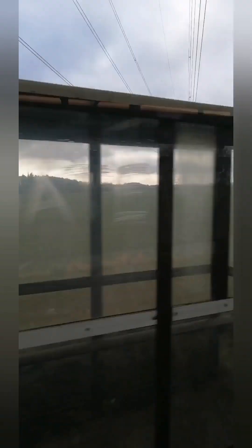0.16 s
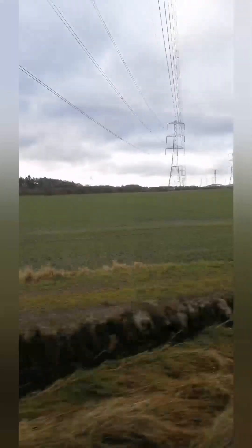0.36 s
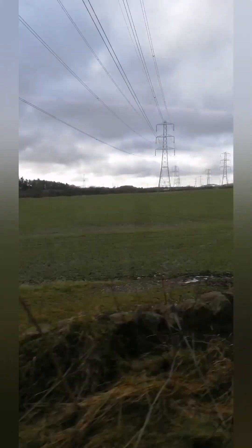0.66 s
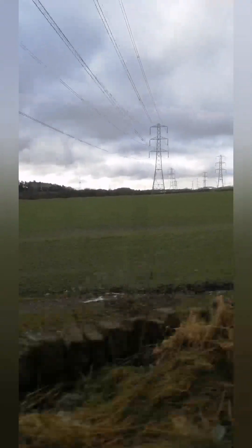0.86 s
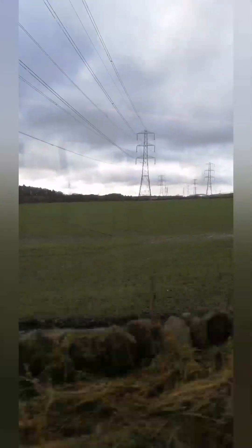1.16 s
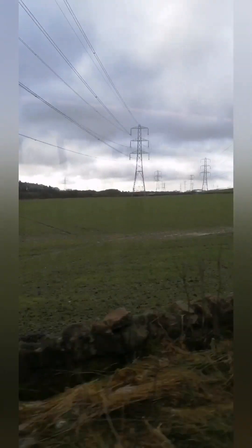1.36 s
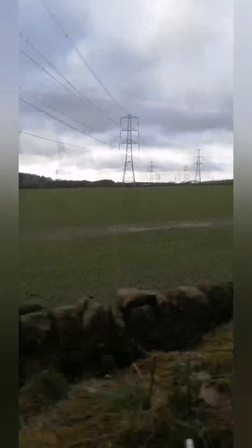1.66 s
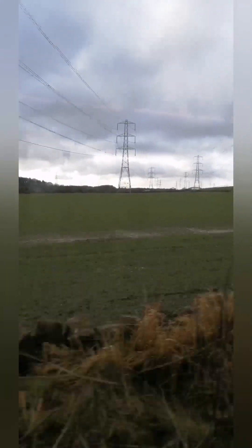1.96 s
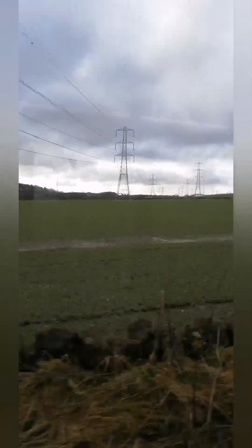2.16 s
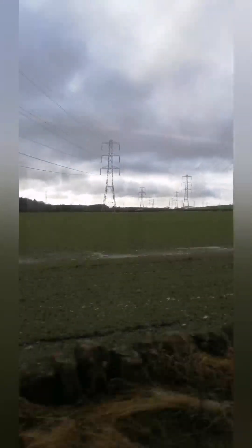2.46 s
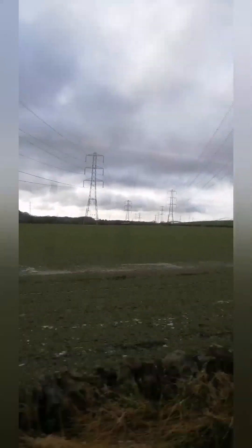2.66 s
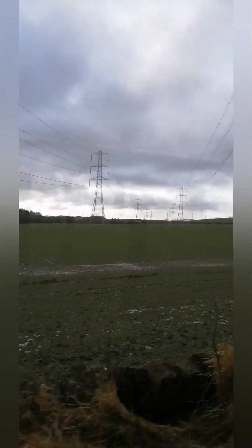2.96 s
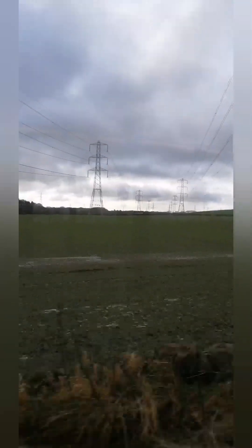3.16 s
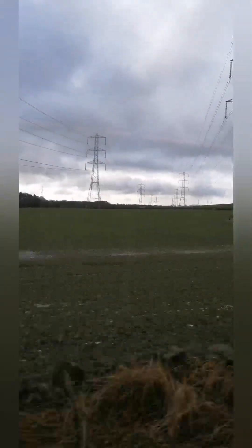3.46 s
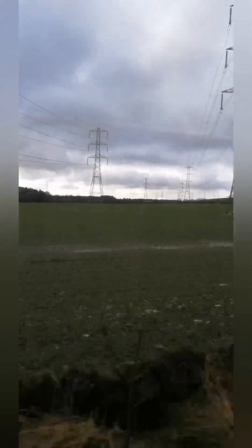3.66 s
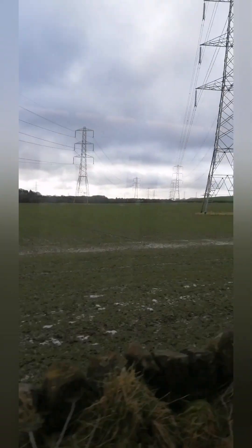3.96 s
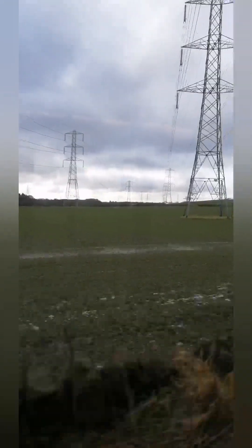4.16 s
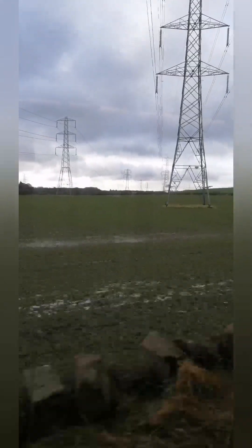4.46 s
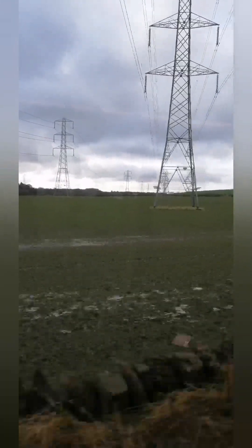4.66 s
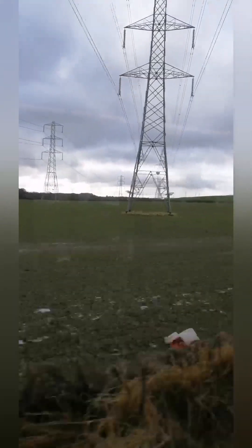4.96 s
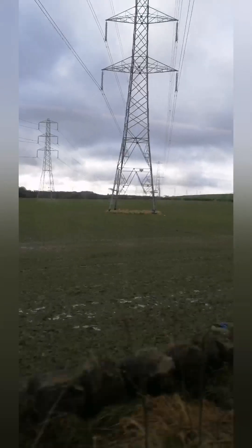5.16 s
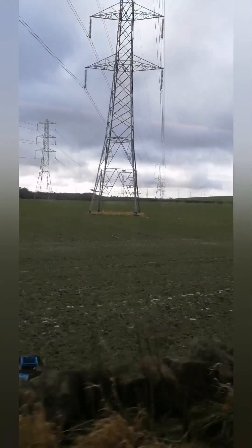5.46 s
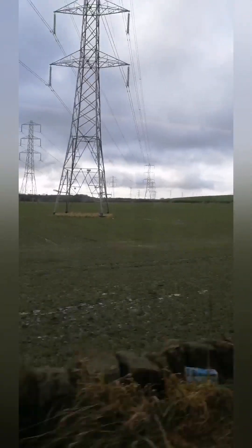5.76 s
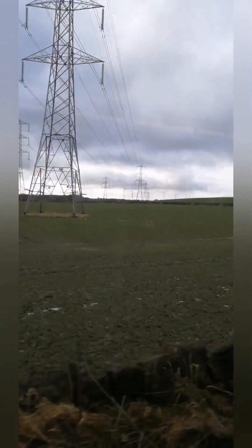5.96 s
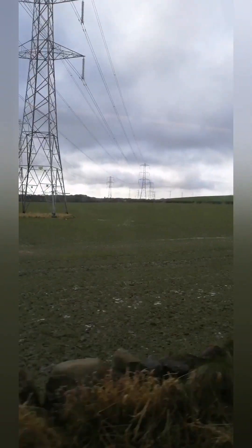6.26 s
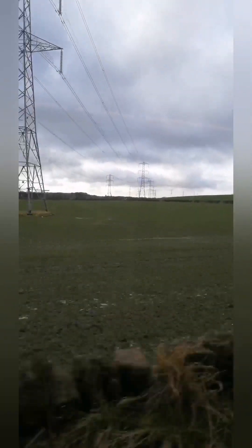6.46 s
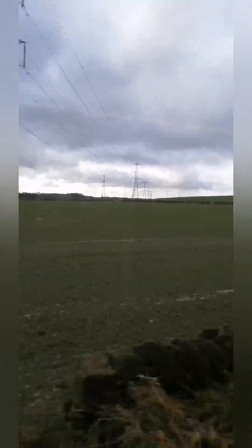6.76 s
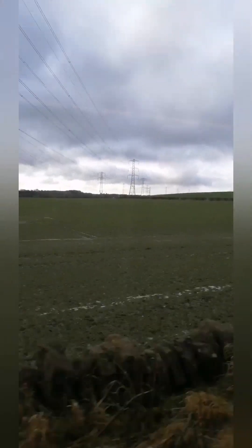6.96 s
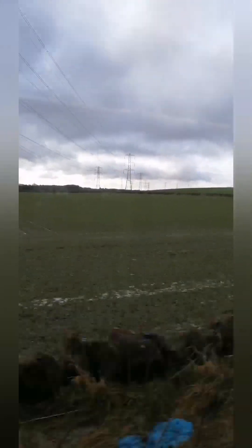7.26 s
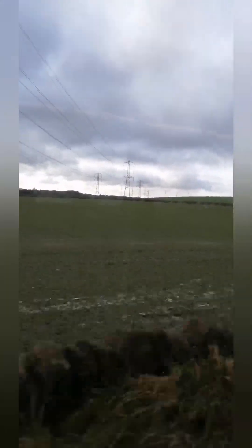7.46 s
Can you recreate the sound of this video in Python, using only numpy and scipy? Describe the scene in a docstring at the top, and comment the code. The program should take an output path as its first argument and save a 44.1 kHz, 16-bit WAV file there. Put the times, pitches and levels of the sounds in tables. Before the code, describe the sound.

From a bus window seat: low engine drone, rumbling road and hissing wet tyres, with splashes, thuds and rattles over a rough stretch.

```python
"""A bus engine, heard from a window seat on a wet country road: it hums, changes up a gear and pulls again.
Road speed sets the pitch of engine and gear whine; engine load sets the hum and the clatter, all made of
sines and pulsed noise. The road rumbles and the tyres roar as filtered noise; noise and random drops make
the crackling spray, most of all in a run of puddles. An air valve hisses close to the start; over broken
asphalt the body knocks, judders and booms, fittings tick and squeak, and a thin sizzle lies on top."""
import sys
import numpy as np
from scipy import signal
from scipy.fft import rfft, irfft, next_fast_len
from scipy.io import wavfile
from scipy.ndimage import uniform_filter1d, map_coordinates

SR = 44100
rng = np.random.default_rng(int(sys.argv[2]) if len(sys.argv) > 2 else 0)


def store_pcm(level_fs):
    """Save levels as 16-bit WAV."""
    pcm = np.round(np.clip(level_fs, -1, 1) * 32767).astype(np.int16)
    wavfile.write(sys.argv[1], SR, np.atleast_2d(pcm).T)


N = 335484  # samples

# All levels are relative: stereo balance, random wobble and other offsets may be added to them.
# A t60 is the time in which a sound falls by 60 dB.

# The cabin around the seat.
# Likeness of the left and right channels. Each row: frequency in Hz, likeness from -1 to 1.
LEFT_RIGHT_LIKENESS = [(60, .99), (100, .97), (160, .94), (270, .87), (450, .58), (740, .1), (1220, -.1),
                       (2000, 0)]
# Air resonances of the cabin. Each row: frequency in Hz, width in Hz, lift in dB.
CABIN_MODES = [(159.6, 14, 3), (205, 20, 4.5), (369.3, 16, 2.5), (666, 19, 2.5), (780, 78, 1.5)]
TOP_HZ = 15760  # band limit of the phone

# Road speed, as the rate at which the final drive's teeth mesh. Each row: time in seconds, rate in Hz.
TOOTH_MESH_RATE = [(0, 558.8), (1.1, 581), (1.7, 585.5), (3.3, 556.2), (4.25, 570.3), (7.61, 614.2)]
# Engine load, eased off for the gear change. Each row: time in seconds, level about full pull in dB.
ENGINE_LOAD = [(0, -11), (.25, 0), (.9, 1), (1.5, -5), (1.9, -9.5), (4, -12), (4.25, -0.5), (5, -0.5),
               (6, -3), (7.35, 0.5), (7.61, -11)]
LOW_GEAR, HIGH_GEAR = 9.81, 12.46  # tooth meshes per firing
SHIFT_AT_S, SHIFT_TAKES_S = 1.75, 0.55
# Level of the firing tone itself. Each row: time in seconds, level in dB.
FIRING_TONE_LEVEL = [(0, -36.5), (.5, -26), (1.1, -30), (1.6, -28), (2.8, -29), (3.4, -28), (4.3, -25.5),
                     (4.7, -44), (5.05, -45), (5.45, -35), (5.8, -24), (7.61, -24)]
# Orders of the firing rate; those between the whole ones come from unequal cylinders.
# Each row: multiple of the firing rate, level in low gear in dB, level in high gear in dB, dB gained per dB of load.
HUM_ORDERS = [(1.25, -33, -48, 0.5), (1.75, -42, -49, .3), (2, -23.5, -22.5, 1), (2.25, -38.5, -47, 0),
              (2.75, -37, -51, 1), (3, -32, -37.5, 0.4), (3.5, -55, -38.5, 0.4), (4, -43, -52.5, 0.5),
              (5.5, -46.5, -49, 0.1), (7, -56, -47.5, 1.2)]
CLATTER_DB, CLATTER_PER_LOAD = -47, 0.67  # level in dB, dB gained per dB of load
SLOW_ENGINE_DB = -4  # the engine clatters less once it turns slower, in high gear
# Spectrum of the clatter. Each row: frequency in Hz, left in dB, right in dB.
CLATTER_SPECTRUM = [(350, -11, -16), (595, -7, 4.5), (810, -1.5, 1), (970, -8.5, -2), (1290, -12, -5.5),
                    (2000, -22.5, -26), (2580, -14.5, -11.5), (4000, -36, -39), (9000, -50, -48)]

# Spells in which the gears sing. Each row: start in seconds, length in seconds, level in dB.
GEAR_WHINES = [(.82, 0.59, -44), (1.4, 0.11, -40.5), (1.9, 0.14, -42.5), (2.62, 0.17, -47),
               (3.08, 0.32, -42), (3.6, 0.097, -43), (5.1, .54, -47.5)]
WHINE_FLOOR_DB = -53.5

# Coarseness of the asphalt. Each row: time in seconds, tyre noise in dB, shaking of the body in dB.
ASPHALT = [(0, -10.5, -11.5), (.25, -6.5, -7.5), (.9, -3, -7.5), (1.55, -0.5, -4.5), (1.9, 1, 0.5),
           (2.3, -1, -1), (2.65, -1.5, 1), (3.1, 0, -1), (5.2, 1, -0.7), (6.6, 0.8, -1.7), (7.2, 0, -3),
           (7.45, 1, -1.5), (7.61, -3, -1.5)]
RUMBLE_DB, ROAR_DB, SWAY_DB = -24.5, -34.5, -30.5
# Spectra of body rumble, tyre roar and deep lurching. Each row: frequency in Hz, left in dB, right in dB.
RUMBLE_SPECTRUM = [(10, -15, -17), (22, -10, -0.5), (33, -13.5, 0.5), (71, -4, -1.5), (122, -10.5, -3),
                   (150, -8.5, -4.5), (214.5, -14.5, -8.5), (243, -15.5, -9.5), (295, -24, -19.5),
                   (465, -41, -36), (900, -74, -74)]
ROAR_SPECTRUM = [(150, -21.5, -11), (289, -10.5, -7.5), (357, -8, 0.5), (382, -8.5, -2.5), (399, -13, -6),
                 (544.6, -15, -11), (538, -9, -7.5), (707, -17.5, -12.5), (914, -22, -16.5),
                 (1105, -30, -22), (1740, -37.5, -28.5), (3060, -37, -44), (3780, -54.5, -55),
                 (8000, -65, -74)]
LURCH_SPECTRUM = [(5, -20, -20), (12, 4, -1), (22.7, 6, 6.5), (40, -18, -19), (90, -36, -43),
                  (300, -81, -76)]

SPRAY_DB, SLOSH_DB = -58, -53.5  # the film of water that covers the whole road
# Puddles, and first a brief swell as the tyre noise echoes off a roadside shelter. Each row: start in seconds,
# length in seconds, spray in dB, slosh in dB.
PUDDLE_EVENTS = [(0.17, 0.048, -62, -48), (0.826, 0.13, -58.5, -51.5), (1.198, 0.3, -65, -54.5),
                 (1.48, 0.14, -54, -47), (1.87, 0.13, -49.5, -45.5), (1.978, 0.075, -42, -43.5),
                 (2.118, 0.62, -53, -55.5), (2.316, 0.26, -49.5, -43), (2.645, 0.28, -54.5, -52),
                 (7.203, 0.16, -52.5, -54), (7.285, 0.17, -51.5, -46), (7.407, .25, -43.5, -43)]
PUDDLE_ATTACK_S, PUDDLE_RELEASE_S = 0.078, 0.83
# Level of the finest fizz of the water. Each row: time in seconds, level in dB.
FIZZ_LEVEL = [(0, -69.5), (3.4, -63), (4.2, -63), (6.5, -64.5), (7.1, -62.5), (7.35, -57), (7.61, -51)]
# Spectra of spray, slosh and fizz. Each row: frequency in Hz, left in dB, right in dB.
SPRAY_SPECTRUM = [(900, -42, -26), (2020, -6, 2), (3120, -6.5, -2), (3820, -14, -15.5), (5270, -3, -1),
                  (6080, -9, -3.5), (7030, -2.5, 1.5), (8200, -1.5, -11.5), (9000, -9, -15.5),
                  (11500, -19, -22), (14000, -24, -26), (15800, -34, -22)]
SLOSH_SPECTRUM = [(300, -2.5, -39), (895, 1, -5.5), (1430, -5.5, 3.5), (2160, -6.5, -3), (3090, -9.5, -8),
                  (4020, -18, -22.5), (8000, -42, -49)]
FIZZ_SPECTRUM = [(2000, -10, -2), (4000, -18, -0.5), (7000, -6, 8.5), (9500, -13, -12), (10200, -8, -5.5),
                 (13800, -12, -8), (15000, -16, -6), (15800, -19, -22)]

# Level of the topmost sizzle. Each row: time in seconds, level in dB.
SIZZLE_LEVEL = [(0, -74), (1.1, -73), (1.5, -81), (3.4, -78), (4.2, -69.5), (6.4, -70), (7.61, -71)]
# Spectrum of the sizzle. Each row: frequency in Hz, left in dB, right in dB.
SIZZLE_SPECTRUM = [(13500, -39, -39), (14700, -6, 3), (15200, -5, -3), (15800, -22, -23)]
SIZZLE_FLUTTER_HZ, SIZZLE_FLUTTER_DB = 12, 1.6
# Thin whistling lines above the spray. Each row: frequency in Hz, level in dB.
WHISTLE_LINES = [(10100, -79), (10580, -81), (10900, -82), (11650, -80)]
# The spell in which they sound. Each row: start in seconds, length in seconds, level in dB.
WHISTLING_SPELL = [(3.85, 1.8, 0)]

# Puffs of the air valve. Each row: start in seconds, length in seconds, level in dB.
VALVE_PUFFS = [(.04, 0.099, -59.5), (.14, 0.089, -55)]
VALVE_START_HZ, VALVE_END_HZ, VALVE_SINK_S = 8930, 7650, 0.078
SPIT_DB, SPIT_T60_S = -48, 0.26  # the burst as the valve opens

# Ticks of loose fittings. Each row: start in seconds, clack in dB, bright edge in dB.
FITTING_TICKS = [(.771, -50, -55), (.972, -49, -64), (1.949, -50, -53), (2.718, -40, -51),
                 (3.853, -50, -66), (4.369, -46, -62), (4.429, -46, -53), (5.712, -54, -57),
                 (6.594, -41, -54), (7.183, -43, -56), (7.329, -42, -39)]
TICK_T60_S, EDGE_T60_S = 0.026, 0.022
# Bumps. Each row: start in seconds, thud of the floor in dB, boom of the body in dB,
# knock of the wheel arch in dB, rattle of the panels in dB.
ROAD_BUMPS = [(2.048, -31, -29, -37, -32), (2.07, -34, -34, -24.5, -46), (2.126, -23, -33, -28, -48),
              (2.225, -19.5, -32, -29, -48), (2.284, -15, -30, -30, -50), (2.315, -13.5, -25, -42, -52),
              (2.455, -21, -18, -26, -27), (2.522, -29, -24, -25, -33), (2.6, -16, -28, -33, -44),
              (2.748, -15, -20.5, -29, -33), (2.803, -17, -34, -42, -46), (2.847, -26, -14.5, -32.5, -24.5),
              (3.309, -26, -21.5, -42, -52), (3.78, -24, -25.5, -28, -50)]
PANEL_T60_S, ARCH_T60_S = 0.16, 0.15
# Spectra of clack, bright edge, wheel arch and panels. Each row: frequency in Hz, left in dB, right in dB.
CLACK_SPECTRUM = [(500, -18, -12), (1200, -1, 4), (2600, -1, 1), (4000, -14, -11), (7000, -13, -8),
                  (11000, -22, -19), (15000, -26, -24)]
EDGE_SPECTRUM = [(3000, -25, -25), (7000, -6, -4), (12000, -9, -8), (14600, -1, 4), (15800, -10, -8)]
ARCH_SPECTRUM = [(200, -30, -24), (332, 0, 9.5), (500, -1, -2), (850, -19, -8.5), (1300, -19, -17),
                 (3000, -41, -41)]
PANEL_SPECTRUM = [(90, -12, -10), (204, 15.5, 6), (450, -14, 5), (800, -6, 0), (1180, -9, 4.5),
                  (2000, -19, -8), (3007, -28, -33), (8000, -61, -64)]

# Splashes in the wheel arch. Each row: start in seconds, level in dB, t60 in seconds,
# share of coarse drops from 0 to 1.
ARCH_SPLASHES = [(.94, -52, .45, .3), (1.514, -39, .36, 0.07), (1.579, -39.5, .26, .8),
                 (1.625, -36, 0.2, .15), (1.849, -38.5, 0.3, 0.4), (2.028, -34.5, 0.3, .85),
                 (2.108, -36, 0.34, .4), (2.318, -38, 0.24, 0.2), (2.402, -34, 0.17, .1),
                 (2.484, -38.5, .3, 0.7), (2.604, -36.5, .3, .7), (2.91, -40, 0.27, .3),
                 (3.011, -41, .43, .3), (3.06, -43.5, 0.46, 0.3), (3.165, -50, .46, .3),
                 (3.255, -45, .29, 0.1), (4.095, -46, .41, .5), (5.04, -48.5, 0.26, .2),
                 (5.788, -33, 0.095, .4), (5.839, -36, .25, 0.34), (5.987, -38, 0.26, .35),
                 (6.281, -41, 0.31, 0.4), (6.466, -40, .14, .3), (7.158, -41.5, .33, 0.5),
                 (7.22, -44, 0.45, .3), (7.322, -40, .4, .2)]
SPLASH_RISE_S = 0.011
# Spectra of fine and coarse drops. Each row: frequency in Hz, left in dB, right in dB.
FINE_SPECTRUM = [(1500, -34, -30), (2950, -4, -14), (3900, -20, -28), (6140, -16, -13), (7100, -4, 0),
                 (7800, 1.5, -8), (9100, -5.5, -12), (11000, -21, -24), (15800, -25, -19)]
COARSE_SPECTRUM = [(1500, -30, -23), (2950, -3, 0), (3900, -19, -19), (5230, -3, 0), (6140, -6, 0),
                   (7100, -1, 3), (7900, -2, -10), (9150, -9, -14), (11000, -19, -22), (15800, -24, -19)]

# Heaves of the body on its springs. Each row: start in seconds, length in seconds, level in dB.
BODY_HEAVES = [(1.38, 0.088, -27.5), (1.75, 0.43, -24), (2.33, 0.21, -22)]
# Stretches of broken asphalt. Each row: start in seconds, length in seconds, level in dB.
BROKEN_STRETCHES = [(2.08, 0.35, -28), (2.55, 0.21, -32), (2.95, 0.51, -32), (3.72, 0.13, -29),
                    (7.28, .16, -31)]
# Spectrum of the judder. Each row: frequency in Hz, left in dB, right in dB.
JUDDER_SPECTRUM = [(25, -22, -13), (55, -4, 2.5), (84.5, -1, 4.5), (127, -6, 1), (197, -19, -12.5),
                   (280, -13, -8.5), (386, -23, -11.5), (497, -21, -13.5), (900, -68, -65)]

# Deep water under the wheel. Each row: start in seconds, length in seconds, level in dB.
DEEP_WATER = [(1.95, 0.34, -38.5), (7.33, 0.27, -38)]

# What a bump rings in the body. Each row: frequency in Hz, level in dB, t60 in seconds.
BODY_RESONANCES = [(206.3, -3, 0.36), (378, -26, 0.33)]
FLOOR_T60_S, FLOOR_HZ = 0.27, 59.1

# Rubs of squeaking fittings. Each row: start in seconds, length in seconds, pitch in Hz, level in dB,
# roughness as a share of the pitch.
FITTING_RUBS = [(2.612, .018, 2020, -44, .045), (2.802, .015, 2010, -51, .04),
                (3.79, .045, 3320, -62, .035), (4.1, .075, 3085, -61.5, .011),
                (4.208, .048, 3062, -57, .009), (7.455, .025, 11900, -62, .014),
                (7.555, .04, 12050, -61, .011)]


def amp(db):
    """Decibels to gain."""
    return 10 ** (np.asarray(db) / 20)


def unit(x):
    """x at rms 1."""
    return x / np.sqrt(np.mean(x ** 2) + 1e-20)


def along(points, hz):
    """Each column of (Hz, value, ..) points on a log axis."""
    f, *cols = np.transpose(points)
    return np.array([np.interp(np.log(hz + 1), np.log(f + 1), c) for c in cols])


def curves(rows):
    """One value per sample for each column after the time."""
    s, *cols = np.transpose(rows)
    return [np.interp(np.arange(N) / SR, s, c) for c in cols]


def wobble(rate):
    """A smooth random curve, rate knots a second."""
    knots = rng.standard_normal(int(N * rate / SR) + 4)
    return map_coordinates(knots, [np.arange(N) * rate / SR])


def filtered(x, response):
    """x times a response of frequency."""
    m = next_fast_len(N + SR // 2)
    return irfft(rfft(x, m) * response(np.fft.rfftfreq(m, 1 / SR)), m)[..., :N]


def phase_of(hz):
    """Running phase of a moving frequency."""
    return 2 * np.pi * np.cumsum(hz) / SR


def narrow_noise(width_hz):
    """Stereo noise of rms 1 close to 0 Hz, which a sine carries up to its own pitch as a band."""
    return unit(filtered(rng.standard_normal((2, N)), lambda f: 1 / (1 + (f / width_hz) ** 2)))


def cabin(pair, spectrum):
    """Two unrelated signals as a diffuse field of rms 1: alike in the bass, apart in the treble, with resonances."""
    def mid_side(hz):
        turn = np.arccos(np.clip(along(LEFT_RIGHT_LIKENESS, hz)[0], -1, 1)) / 2
        return np.array([np.cos(turn), np.sin(turn)])

    def colour(hz):
        lift = sum(db / (1 + (2 * (hz - centre) / width) ** 2) for centre, width, db in CABIN_MODES)
        return amp(along(spectrum, hz) + lift)

    mid, side = filtered(pair, mid_side)
    return unit(filtered(np.array([mid + side, mid - side]), colour))


def rush(spectrum, patchy_db):
    """Cabin noise with drifting patches of random gain."""
    z = signal.stft(rng.standard_normal((2, N)), nperseg=512)[2]
    field = uniform_filter1d(rng.standard_normal(z.shape[1:]), size=5, axis=0)  # across frequency
    field = uniform_filter1d(field, size=14, axis=1)  # across time
    patchy = signal.istft(z * amp(patchy_db * unit(field)), nperseg=512)[1][:, :N]
    return cabin(patchy, spectrum)


def droplets(rate, scatter_db):
    """Single drops strike at random moments, rate a second, with unequal force."""
    struck = rng.random((2, N)) < rate / SR
    force = amp(scatter_db * rng.standard_normal((2, N)))
    return unit(struck * rng.standard_normal((2, N)) * force)


def bursts(events, rise):
    """Envelope of (s, dB, t60) events that swell and die away."""
    power = np.zeros(N)
    for s, db, t60 in events:
        t = np.maximum(np.arange(N) / SR - s, 0)
        power += (amp(db - 60 * t / t60) * (1 - np.exp(-t / rise))) ** 2
    return np.sqrt(power)


def swells(events, attack, release):
    """Envelope of (s, length, dB) events: each rises, holds, then falls 60 dB in the release time."""
    t = np.arange(N) / SR
    power = np.zeros(N)
    for s, length, db in events:
        fall_db = 60 * np.maximum(t - s - length, 0) / release
        power += (np.clip((t - s) / attack, 0, 1) * amp(db - fall_db)) ** 2
    return np.sqrt(power)


def shifted():
    """0 in low gear, 1 in high gear, sliding between them during the change."""
    return np.clip((np.arange(N) / SR - SHIFT_AT_S) / SHIFT_TAKES_S, 0, 1)


def firing_rate():
    """The engine turns with the road speed, through the gear that is engaged."""
    mesh_hz, = curves(TOOTH_MESH_RATE)
    return mesh_hz / (LOW_GEAR + (HIGH_GEAR - LOW_GEAR) * shifted())


def engine():
    """The firing pulses reach the seat as a firing tone and a few orders, most of which grow with the load."""
    load_db, = curves(ENGINE_LOAD)
    gear = shifted()
    phase = phase_of(firing_rate() * (1 + 0.0023 * wobble(8.7)))
    orders = [(1, curves(FIRING_TONE_LEVEL)[0])]
    for multiple, low_db, high_db, grows in HUM_ORDERS:
        orders.append((multiple, low_db + (high_db - low_db) * gear + grows * load_db))
    cylinders = 4
    hum = np.zeros(N)
    for multiple, db in orders:
        locked = np.round(multiple * cylinders) / cylinders  # everything repeats once per engine cycle
        hum += amp(db + 0.18 * wobble(9)) * np.sin(locked * phase + rng.uniform(0, 2 * np.pi))
    return hum * amp([[-3.9], [2.3]])


def clatter():
    """Combustion noise from the engine bay, pulsing once per firing and growing with the load."""
    load_db, = curves(ENGINE_LOAD)
    pulse = np.exp(0.6 * np.cos(phase_of(firing_rate())))
    level_db = CLATTER_DB + CLATTER_PER_LOAD * load_db + SLOW_ENGINE_DB * shifted()
    return amp(level_db) * unit(pulse * rush(CLATTER_SPECTRUM, patchy_db=0.5))


def gears():
    """A thin, unsteady tone of meshing teeth, blurred by their play."""
    mesh_hz, = curves(TOOTH_MESH_RATE)
    phase = phase_of(mesh_hz * (1 + 0.008 * wobble(60)))
    level = np.hypot(amp(WHINE_FLOOR_DB), swells(GEAR_WHINES, attack=0.05, release=0.52))
    return level * amp(2.7 * wobble(26)) * np.sin(phase) * amp([[1.5], [-2.2]])


def road():
    """The tyres shake the body, which rumbles and sways, and roar on the asphalt."""
    road_db, shake_db = curves(ASPHALT)
    rumble = amp(RUMBLE_DB + shake_db + 1.04 * wobble(7.6)) * rush(RUMBLE_SPECTRUM, patchy_db=-0.32)
    roar = amp(ROAR_DB + road_db + 0.41 * wobble(13)) * rush(ROAR_SPECTRUM, patchy_db=1.13)
    sway = amp(SWAY_DB + shake_db) * rush(LURCH_SPECTRUM, patchy_db=-0.5)
    return rumble + roar + sway


def water():
    """Mist and drops fly off the tread in uneven spurts; puddles add more, and water sloshes lower down."""
    road_db, _ = curves(ASPHALT)
    puddle_spray = [(s, length, db) for s, length, db, _ in PUDDLE_EVENTS]
    puddle_slosh = [(s, length, db) for s, length, _, db in PUDDLE_EVENTS]
    in_puddles = lambda rows: swells(rows, PUDDLE_ATTACK_S, PUDDLE_RELEASE_S)
    flow = np.hypot(amp(SPRAY_DB + 0.57 * road_db), in_puddles(puddle_spray))
    depth = np.hypot(amp(SLOSH_DB + 0.35 * road_db), in_puddles(puddle_slosh))

    # a heavy flow is steadier than a thin one
    unevenness = np.interp(20 * np.log10(flow), [-57, -45], [1, 0.4])
    spurts_db = unevenness * (0.63 * wobble(22) + 1.66 * wobble(80))
    mist = rush(SPRAY_SPECTRUM, patchy_db=1.5)
    drops = cabin(droplets(rate=2100, scatter_db=1.5), SPRAY_SPECTRUM)
    spray = flow * amp(spurts_db) * (mist + amp(-7.5) * drops)
    slosh = depth * amp(0.92 * spurts_db) * rush(SLOSH_SPECTRUM, patchy_db=1.5)

    fizz_db, = curves(FIZZ_LEVEL)
    fine_drops = cabin(droplets(rate=62, scatter_db=0.0), FIZZ_SPECTRUM)
    fizz_noise = rush(FIZZ_SPECTRUM, patchy_db=4) + amp(-18) * fine_drops
    return spray + slosh + amp(fizz_db + 0.93 * spurts_db) * fizz_noise


def sizzle():
    """Dense random crackle flutters at the very top; for a spell narrow noise bands whistle faintly with it."""
    level_db, = curves(SIZZLE_LEVEL)
    flutter_hz = SIZZLE_FLUTTER_HZ * (1 + 0.15 * wobble(5))
    flutter_db = SIZZLE_FLUTTER_DB * np.sin(phase_of(flutter_hz))
    crackle = amp(1.3 * wobble(16)) * cabin(droplets(rate=3000, scatter_db=2), SIZZLE_SPECTRUM)
    t = np.arange(N) / SR
    lines = sum(amp(db) * narrow_noise(60) * np.sin(2 * np.pi * hz * t) for hz, db in WHISTLE_LINES)
    whistles = swells(WHISTLING_SPELL, attack=0.24, release=4) * lines
    return amp(level_db + flutter_db) * crackle + amp(3) * whistles


def valve():
    """The valve opens with a broad spit; then escaping air hisses in two bands that sink as the pressure falls."""
    opens_s = VALVE_PUFFS[0][0]
    pressure = np.exp(-np.maximum(np.arange(N) / SR - opens_s, 0) / VALVE_SINK_S)
    centre_hz = VALVE_END_HZ + (VALVE_START_HZ - VALVE_END_HZ) * pressure
    band = lambda hz, width_hz: narrow_noise(width_hz) * np.sin(phase_of(hz))
    spit = bursts([(opens_s, SPIT_DB, SPIT_T60_S)], rise=0.004) * band(0.8 * centre_hz, width_hz=1500)
    air = band(centre_hz, width_hz=320) + band(0.63 * centre_hz, width_hz=850)
    return spit + swells(VALVE_PUFFS, attack=0.012, release=0.22) * air


def knocks():
    """Short noise bursts: fittings tick dully or brightly, bumps knock the hollow wheel arch and jolt the panels."""
    clack_hits = [(s, db, TICK_T60_S) for s, db, _ in FITTING_TICKS]
    edge_hits = [(s, db, EDGE_T60_S) for s, _, db in FITTING_TICKS]
    arch_hits = [(s, db, ARCH_T60_S) for s, _, _, db, _ in ROAD_BUMPS]
    panel_hits = [(s, db, PANEL_T60_S) for s, _, _, _, db in ROAD_BUMPS]
    clacks = bursts(clack_hits, rise=0.0005) * rush(CLACK_SPECTRUM, patchy_db=1.0)
    edges = bursts(edge_hits, rise=0.0005) * rush(EDGE_SPECTRUM, patchy_db=0.5)
    arch = bursts(arch_hits, rise=0.005) * rush(ARCH_SPECTRUM, patchy_db=1)
    panels = bursts(panel_hits, rise=0.005) * rush(PANEL_SPECTRUM, patchy_db=1)
    return arch + panels + clacks + edges


def splashes():
    """Standing water throws showers at the wheel arch: fine drops sound high, coarse ones lower."""
    def shower(spectrum):
        drops = cabin(droplets(rate=900, scatter_db=1.5), spectrum)
        return rush(spectrum, patchy_db=1.5) + amp(-2) * drops

    share_db = lambda share: 10 * np.log10(np.clip(share, 0.01, 1))
    fine_hits = [(s, db + share_db(1 - coarse), t60) for s, db, t60, coarse in ARCH_SPLASHES]
    coarse_hits = [(s, db + share_db(coarse), t60) for s, db, t60, coarse in ARCH_SPLASHES]
    fine = bursts(fine_hits, SPLASH_RISE_S) * shower(FINE_SPECTRUM)
    coarse = bursts(coarse_hits, SPLASH_RISE_S) * shower(COARSE_SPECTRUM)
    return amp(-6.5 + 1.6 * wobble(90)) * (fine + coarse)


def judder():
    """Broken asphalt shakes the floor through the suspension, and the body heaves on its springs."""
    shake = swells(BROKEN_STRETCHES, attack=0.038, release=0.38) * amp(2.3 * wobble(16))
    heave = swells(BODY_HEAVES, attack=0.078, release=0.9) * rush(LURCH_SPECTRUM, patchy_db=-1)
    return shake * rush(JUDDER_SPECTRUM, patchy_db=1.5) + heave


def drumming():
    """Deep water drums on the wheel arch, a hollow wash of noise under the spray."""
    level = swells(DEEP_WATER, attack=0.063, release=0.98) * amp(3.9 * wobble(25))
    return level * rush(ARCH_SPECTRUM, patchy_db=1.0)


def booms():
    """Each bump rings the floor and the damped resonances of the body, whose periods vary every few cycles."""
    ring = lambda hz: np.sin(phase_of(hz * (1 + 0.0434 * wobble(hz / 2))))
    thuds = [(s, db, FLOOR_T60_S) for s, db, _, _, _ in ROAD_BUMPS]
    total = bursts(thuds, rise=0.0045) * ring(FLOOR_HZ)
    for hz, mode_db, t60 in BODY_RESONANCES:
        hits = [(s, db + mode_db, t60) for s, _, db, _, _ in ROAD_BUMPS]
        total += bursts(hits, rise=0.0065) * ring(hz)
    return total * amp([[-2], [2.5]])


def squeak():
    """Fittings rub and sing for a moment, each at its own pitch, some hoarsely."""
    tones = np.zeros(N)
    for s, length, hz, db, rough in FITTING_RUBS:
        tone = np.sin(phase_of(hz * (1 + rough * wobble(500))))
        tones += swells([(s, length, db)], attack=0.011, release=0.14) * tone
    grip_db = 1.8 * wobble(70)
    return amp(grip_db) * tones * amp([[2], [-2]])


def scene():
    """Everything heard from a window seat."""
    drive = engine() + clatter() + gears() + valve()
    body = road() + judder() + knocks() + booms() + squeak()
    wet = water() + drumming() + splashes()
    return drive + body + wet + sizzle()


def record(dry):
    """The phone keeps nothing above its band limit."""
    return filtered(dry, lambda hz: hz < TOP_HZ)


dry = scene()
out = record(dry)
store_pcm(out)
```